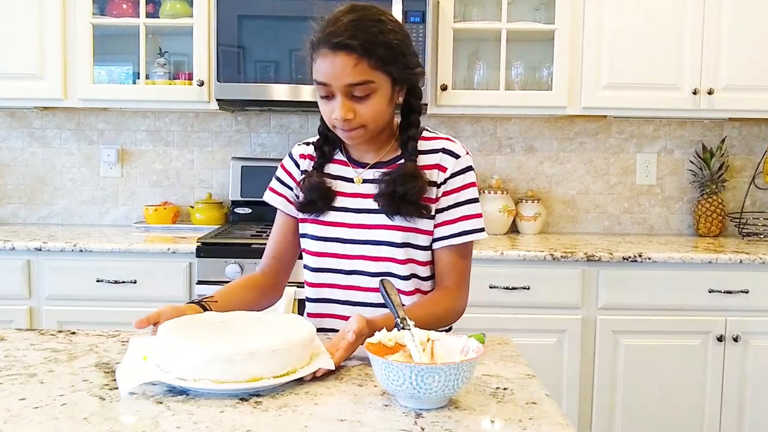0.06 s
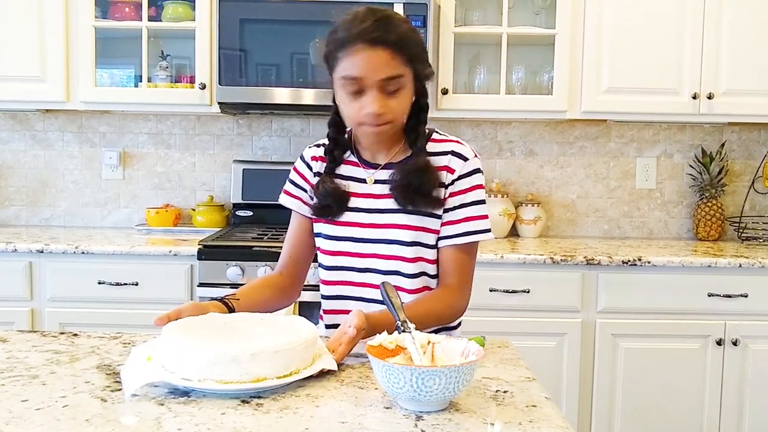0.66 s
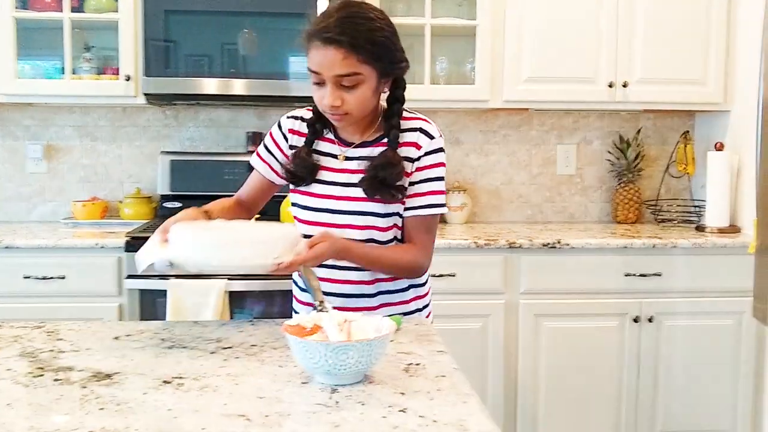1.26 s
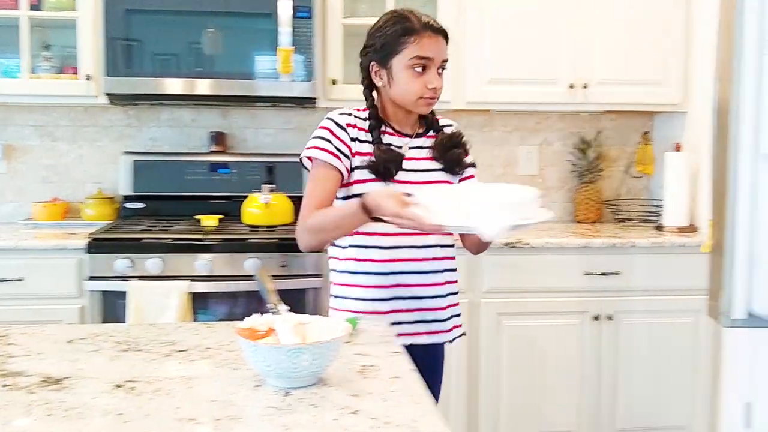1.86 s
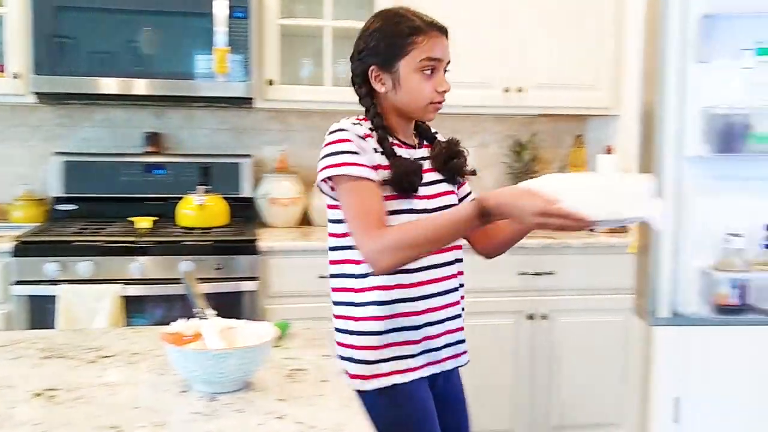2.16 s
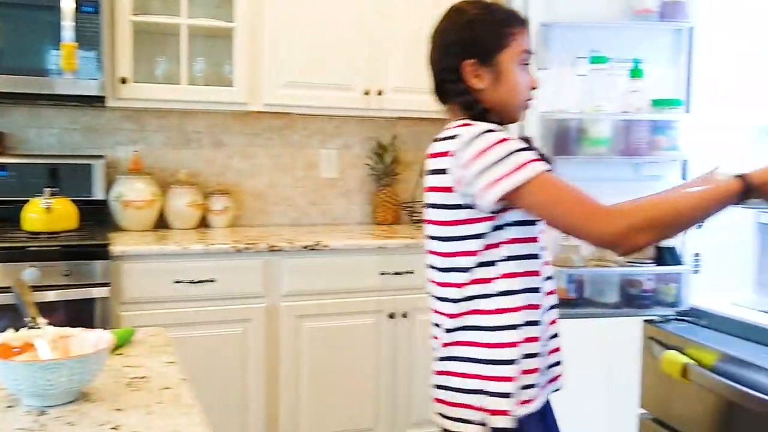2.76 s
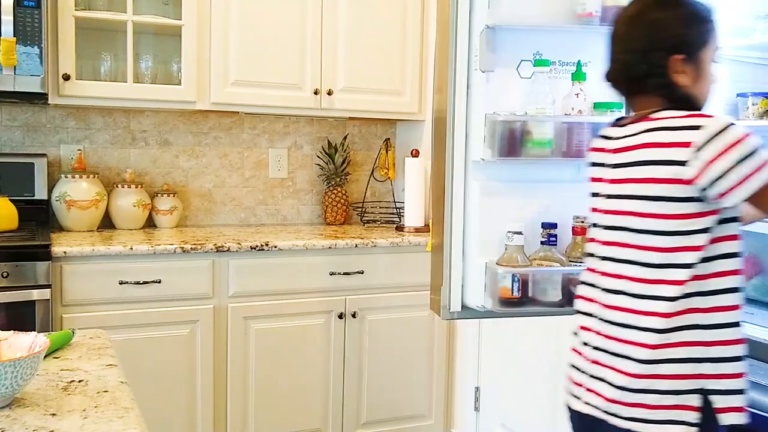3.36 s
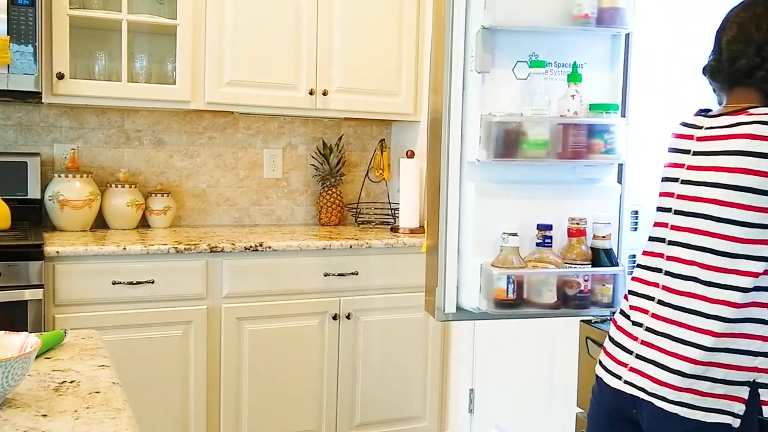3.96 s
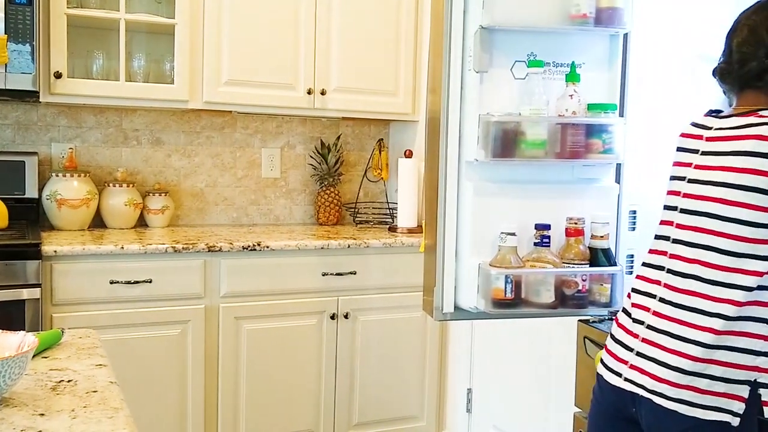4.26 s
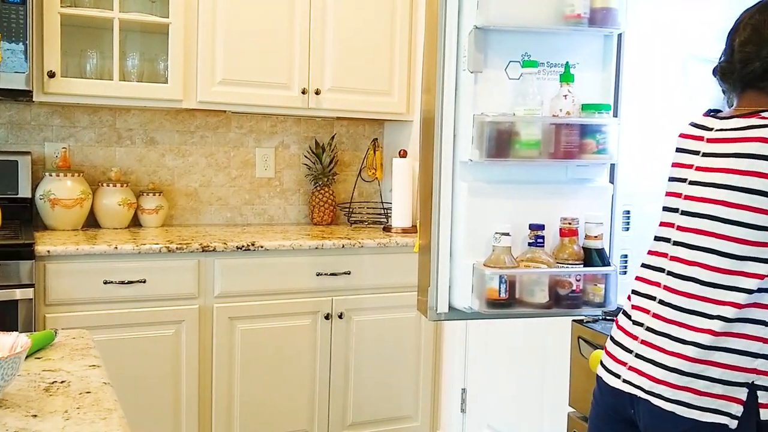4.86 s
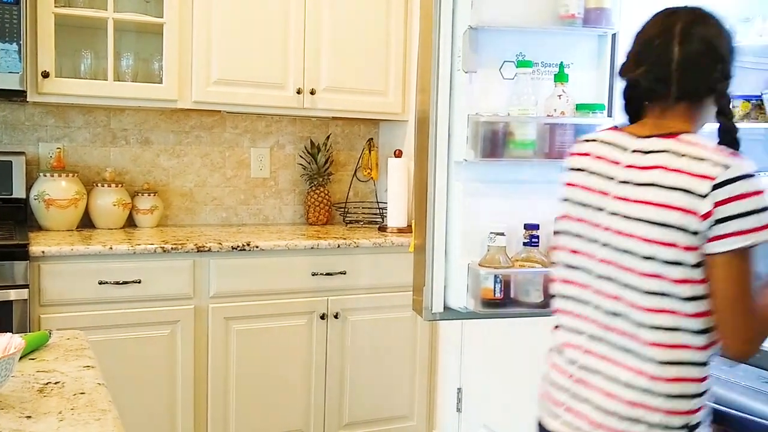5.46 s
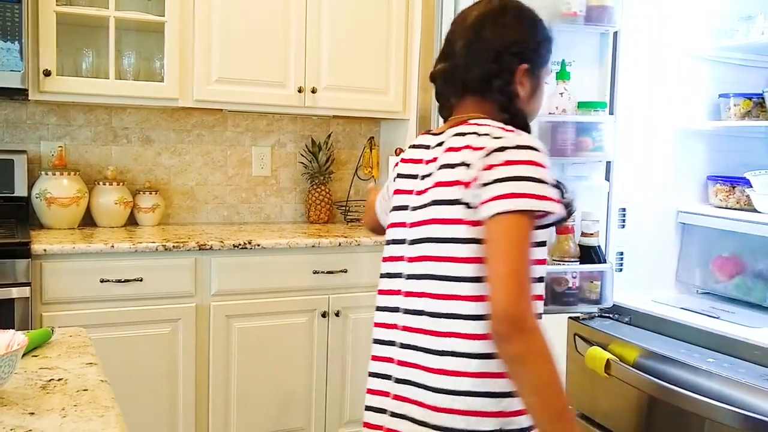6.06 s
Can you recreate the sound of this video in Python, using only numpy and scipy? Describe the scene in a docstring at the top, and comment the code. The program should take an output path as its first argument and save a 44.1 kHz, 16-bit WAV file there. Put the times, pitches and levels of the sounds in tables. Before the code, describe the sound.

A plate scrapes off a stone counter, feet scuff and doors click, then the plate knocks onto a refrigerator shelf over a faint hum.

```python
"""A hard, bright kitchen: a cake on a plate is lifted off a stone counter and set on a refrigerator shelf.
Impacts excite damped resonances: plate and doors clack, heels and hands bump, the plate rings on the
shelf and jars rattle. Stick-slip friction makes soles scuff and the plate scrape; the refrigerator hums.
Two microphones a hand's length apart are cross-fed for width; the sound drops out briefly near the start."""
import sys
import numpy as np
from scipy import signal
from scipy.fft import rfft, irfft
from scipy.io import wavfile
from scipy.ndimage import uniform_filter1d

SR = 44100
rng = np.random.default_rng(int(sys.argv[2]) if len(sys.argv) > 2 else 0)


def materialize(psi):
    """Save the field psi as 16-bit PCM at rate SR to the path in sys.argv[1].

    A 1-D psi becomes a single channel; in a 2-D psi each row is a channel.
    """
    bounded = np.clip(np.atleast_2d(psi).T, -1, 1)
    quanta = np.round(bounded * 32767).astype(np.int16)
    wavfile.write(sys.argv[1], SR, quanta)


N = 269892
TIME = np.arange(N) / SR
EVENT_TIME = TIME[:32768]
MIC_SPACING_S, SOURCE_LAG_S = .000452, .00031  # travel between microphones; lag of the direct sound

# Levels in the tables are relative; each source applies its own gain.
# spectrum of the refrigerator's moving air: frequency_hz, gain_db
AIR_SPECTRUM = [(60, -44.5), (110, -3.5), (170, -2), (260, -1), (600, -2), (1200, -2), (2000, -7.5),
                (3200, -10), (4600, -13.5), (6000, -18.5), (11000, -22.5), (12000, -36.5), (12800, -48.5)]
# fan tones: pitch_hz, level_db
FAN_TONES = [(262, -83.5), (371, -81)]
# soles, plate and doors rubbing: peak_s, rise_s, fall_s, level_db, tilt_db_per_octave
SCUFF_STROKES = [(0.021, 0.022, 0.028, -49, -3), (0.501, 0.059, 0.072, -58.5, 2),
                 (0.654, 0.0079, 0.0096, -47, -1), (1.362, 0.0082, 0.034, -59.5, -3),
                 (1.53, 0.0084, 0.01, -50.5, -7.5), (1.6, 0.034, 0.085, -55.5, -6.5),
                 (1.706, .011, 0.032, -51, -12.5), (2.141, 0.0088, 0.029, -38, -2.5),
                 (2.258, 0.018, 0.016, -40.5, -1.5), (2.522, 0.011, 0.023, -39.5, 3),
                 (2.861, 0.029, 0.13, -63, -6.5), (3.066, 0.016, 0.038, -34, 2),
                 (3.231, .0046, 0.023, -53, -1), (3.326, 0.0076, 0.037, -52.5, -2),
                 (3.57, 0.019, 0.061, -61.5, -3), (3.9, 0.0057, 0.027, -56, -1.5),
                 (5.119, 0.055, 0.089, -51.5, 0), (6.022, 0.025, 0.033, -41, 3),
                 (6.055, 0.019, 0.027, -42.5, 0.5)]
# spectrum of rubbing: frequency_hz, gain_db
SCUFF_SPECTRUM = [(150, -17), (600, -14.5), (1100, -12), (1900, -15), (2700, -5), (4200, -1.5),
                  (5700, -2.5), (7000, -8), (10500, -9), (12000, -16), (13500, -33)]
# impacts of plate and door fittings: start_s, level_db, pitch_hz, ring_db, tilt_db_per_octave, room_db
HARD_IMPACTS = [(0.0195, -39, 5700, 5, 1, -12), (0.6494, -46, 3400, -9, 1, -1),
                (0.6616, -44, 5500, 10, -8, -20), (1.003, -52.5, 1420, -10, -4.5, 2),
                (1.0218, -52.5, 2440, -1, -1, 7.5), (1.0589, -32, 10900, -5, -0.5, -4),
                (1.0665, -32.5, 5430, 4, 4, -3), (1.069, -22.5, 10800, -2.5, 0, -5),
                (1.076, -30.5, 1356, 1, -3.5, -3), (1.5264, -43, 10300, -3, 2.5, -4),
                (1.533, -48, 10000, -9, -5, -10), (1.564, -48, 8850, -1, -2, -4),
                (1.687, -54, 1180, -2, 1.5, 6.5), (2.0758, -61, 3350, -2, -4, 2),
                (2.143, -24.5, 5660, -1, 1.5, -5.5), (2.149, -35, 8200, 7, -1, -11),
                (2.16, -35, 1940, 0, -4, -6), (2.216, -45, 3370, -7, 4, 2), (2.2203, -42, 5650, -9, 1, 4.5),
                (2.242, -29.5, 2910, 0, 3, -13), (2.2556, -39.5, 10650, 16, 3, -2),
                (2.274, -43, 3060, 5, 1, -2), (2.511, -53, 5500, -1, 6, 2),
                (2.7021, -49.5, 3000, -8.5, -2, 0.5), (3.748, -63, 1190, -8, -5.5, -2.5),
                (3.787, -57, 1680, -10, -8, -3), (5.8858, -57.5, 3760, -7, -3.5, 0.5),
                (5.935, -57.5, 3330, -11, -4.5, 6)]
# spectrum of a hard impact: frequency_hz, gain_db
CLACK_SPECTRUM = [(100, -47), (200, -18.5), (600, -17), (1200, 12), (1900, 14.5), (3000, 3), (5500, 8),
                  (7000, -2), (9000, 6), (10800, -4), (12500, -2.5), (15000, -23.5)]
# impacts of heels, hands and things on shelves: start_s, level_db, pitch_hz, contact_s, room_db
SOFT_IMPACTS = [(0.7589, -48, 544, 0.0057, -13.5), (1.527, -54.5, 698, 0.014, -2),
                (1.625, -56.5, 347, 0.017, -14), (1.988, -53, 365, 0.016, -3),
                (2.145, -47.5, 710, 0.032, 4), (2.3923, -60.5, 292, 0.022, -12),
                (3.061, -57.5, 248, 0.061, -2), (3.7486, -59.5, 1187, 0.036, 0.5),
                (3.785, -59, 1162, 0.071, 5), (3.992, -53.5, 1320, 0.061, -3),
                (4.0989, -54, 1020, 0.023, -16.5), (4.335, -57.5, 560, 0.066, 3.5),
                (5.0, -56, 1390, 0.17, 7.5), (5.365, -58, 988, 0.029, 2), (5.475, -59, 555, 0.11, -14)]
# resonances of plate and counter: centre_hz, width_hz, level_db
COUNTER_RESONANCES = [(415, 400, -15.5), (1000, 200, -8), (1320, 220, 0), (1880, 250, -6.5),
                      (2350, 300, -6.5), (2920, 280, 0), (4180, 330, 1.5), (5330, 700, -3.5),
                      (8100, 1580, -10)]
# the plate set down and rocking:
# start_s, level_db, tilt_db_per_octave, ring_db, flatness (0 rim, 1 base), room_db
PLATE_LANDINGS = [(4.547, -28, 0.5, -9, 0, 4.5), (4.6154, -34.5, -1.5, -1.5, 0.95, 3),
                  (4.668, -48, 0, -9, .2, 11.5), (4.7068, -18, 1.5, -3, 1, 3), (4.757, -27, 1, -14, .8, 2),
                  (4.773, -32, 0.5, -17, 0.73, 1.5), (4.839, -46, 0.5, -1, .7, 4)]
# modes of the plate on its shelf: pitch_hz, rim_db, base_db, t60_s
PLATE_MODES = [(470, -7, -22, .12), (678, -16, -6, .15), (845, -6, -6, .16), (894, -9, -1, .13),
               (975, -1, -9, .14), (1048, -6, -8, .16), (1120, -14, 0, .2), (1215, -14, -2, .11),
               (1350, -2, 1, .12), (1492, 3, -12, .09), (1542, -10, -4, .15), (1835, -8, 0, .1),
               (2788, -14, -4, .08), (2860, -12, -5, .06), (3015, -5, -12, .06), (3150, -8, -6, .11),
               (3530, -7, -3, .08)]
# spectrum of an impact on the shelf: frequency_hz, gain_db
SHELF_SPECTRUM = [(100, -39), (180, -4), (330, -8.5), (480, -6), (600, -5), (900, 4.5), (1300, 3.5),
                  (1800, 1.5), (2200, -6.5), (2500, -5.5), (3100, -6), (3700, -7.5), (4500, -11.5),
                  (5300, -15), (7000, -29), (11000, -37), (14000, -58.5)]
# modes of jars and racks: pitch_hz, level_db, t60_s
JAR_AND_RACK_MODES = [(608, -7, .25), (765, 3, .44), (815, 3, .38), (885, -2, .2), (1105, -2, .2),
                      (1520, -3, .25), (1583, -4, .25), (1793, -2, .3), (2810, -4, .07), (3031, -5, .06),
                      (3601, -2, .08)]
# channel balance: frequency_hz, left_minus_right_db
CHANNEL_BALANCE = [(200, 0.5), (600, -3.5), (1200, 1), (3000, 3), (5000, 1.5), (8000, 7), (12000, 4.5)]
# cross-feed between the microphones: frequency_hz, share (0 to 1)
CROSS_FEED_SHARE = [(200, 0.82), (1100, 0.77), (2200, 0.94), (4400, 0.82), (6700, 0.4), (11000, 0)]
# stereo width: frequency_hz, side_db
SIDE_GAIN = [(150, 0.5), (350, 0), (600, -4), (900, -10.5), (1300, -9), (1700, -0.5), (2100, 2),
             (8000, -0.5)]


def undb(db):
    """Amplitude ratio of a level in decibels."""
    return 10 ** (np.asarray(db) / 20)


def freqs(x):
    """Frequency of each Fourier bin of x, at least 1 Hz."""
    return np.maximum(np.fft.rfftfreq(x.shape[-1], 1 / SR), 1)


def curve(points, hz):
    """Interpolation of (frequency_hz, value) points on a logarithmic frequency axis."""
    at, value = np.transpose(points)
    return np.interp(np.log(hz), np.log(at), value)


def colour(x, db):
    """Minimum-phase filtering: folding the cepstrum makes the gain per bin causal."""
    size = x.shape[-1]
    cepstrum = irfft(np.log(undb(db)), size)
    cepstrum[1:size // 2] *= 2
    cepstrum[size // 2 + 1:] = 0
    return irfft(rfft(x) * np.exp(rfft(cepstrum)), size)


def unit(x):
    """Normalisation to unit mean energy per channel."""
    return x / np.sqrt(np.mean(np.sum(x ** 2, axis=-1)))


def fade(t60):
    """Exponential decay, 60 dB down after t60 seconds."""
    return np.exp(-np.log(1000) * EVENT_TIME / t60)


def add(out, x, start_s):
    """Superposition of x on out from start_s."""
    start = max(int(start_s * SR), 0)
    out[:, start:start + x.shape[-1]] += x[:, :N - start]


def diffuse(size, bass_coherence=0.39):
    """A diffuse field at two microphones: coherence falls with frequency as a sinc function."""
    noise = rng.standard_normal((2, size))
    coherence = bass_coherence * np.sinc(2 * freqs(noise) * MIC_SPACING_S)
    mid, side = rfft(noise) * np.sqrt([1 + coherence, 1 - coherence])
    return irfft(np.array([mid + side, mid - side]), size) / 2


def kitchen(room_db, early_t60, late_t60, late_db, build_s=0.0012, dull_hz=7000):
    """Room impulse response: direct sound, dense reflections off cabinets, then duller reverberation."""
    size = len(EVENT_TIME)
    build_up = 1 - np.exp(-(EVENT_TIME / build_s) ** 2)
    early = unit(diffuse(size) * fade(early_t60) * build_up)
    late = diffuse(size) * (fade(late_t60) - fade(early_t60 / 2))
    late = unit(colour(late, -10 * np.log10(1 + (freqs(late) / dull_hz) ** 2)))
    response = undb(room_db) * (early + undb(late_db) * late)
    response[0, 0] += 1
    response[1, int(SOURCE_LAG_S * SR)] += 1
    return response


def radiate(body, db, room):
    """Convolution of a struck body with the room; db is its direct energy spread over 10 ms."""
    direct = unit(body) * undb(db) * np.sqrt(SR / 100)
    return signal.fftconvolve(direct[None], room, axes=1)


def impact(crackle_t60, crackle_db=2):
    """Contact force: one impulse and a brief crackle of the touching surfaces."""
    crackle = rng.standard_normal(len(EVENT_TIME)) * fade(crackle_t60)
    force = undb(crackle_db) * unit(crackle)
    force[0] += 1
    return force


def resonance(pitch_hz, cycles):
    """A damped oscillator that builds up, then decays by about 60 dB over the given cycles."""
    t60 = cycles / pitch_hz
    return unit((fade(t60) - fade(t60 / 2)) * np.sin(2 * np.pi * pitch_hz * EVENT_TIME))


def modal_ring(modes, spread_db=1.5):
    """Free vibration is a sum of damped modes; each contact excites them differently."""
    chance = rng.standard_normal((len(modes), 2))
    return unit(sum(
        undb(db + spread_db * stir) * fade(t60) * np.sin(2 * np.pi * (hz * EVENT_TIME + phase))
        for (hz, db, t60), (stir, phase) in zip(modes, chance)))


def impulses(per_s):
    """A Poisson train of impulses of random sign."""
    size = len(EVENT_TIME)
    return (rng.random(size) < per_s / SR) * rng.choice([-1, 1], size)


def slide_speed(peak_s, rise_s, fall_s):
    """Speed of a stroke: a Gaussian pulse with unequal flanks."""
    t = EVENT_TIME - peak_s
    return np.exp(-.5 * (t / np.where(t < 0, rise_s, fall_s)) ** 2)


def refrigerator(air_db=-66.5, open_db=1, waver_db=-0.07, hum_hz=230, hum_db=-81):
    """Moving air radiates broadband noise; a low hum gives way to fan tones as the doors open."""
    air = diffuse(N)
    air = colour(air, curve(AIR_SPECTRUM, freqs(air)))
    air = air / air.std() * undb(air_db)
    fan = sum(undb(db) * np.sqrt(2) * np.sin(2 * np.pi * (hz * TIME + rng.random()))
              for hz, db in FAN_TONES)
    hum = undb(hum_db) * np.sqrt(2) * np.sin(2 * np.pi * hum_hz * TIME)
    opening = np.interp(TIME, [2.0, 3.6], [0, 1])
    waver = np.interp(TIME, np.linspace(0, TIME[-1], 40), rng.standard_normal(40))
    return hum * (1 - opening) + (air + fan * opening) * undb(open_db * opening + waver_db * waver)


def strokes(drag_s=0.077, drag_db=-19, drag_tilt=-4):
    """A slowing contact drags on: each stroke recurs later, weaker and duller."""
    for peak_s, rise_s, fall_s, db, tilt in SCUFF_STROKES:
        yield peak_s, rise_s, fall_s, db, tilt
        yield peak_s + drag_s, rise_s, fall_s, db + drag_db, tilt + drag_tilt


def scuffs(grain_db=3.8, gain_db=-2):
    """Sliding friction: a dense run of tiny slips whose amplitude follows the speed."""
    out, hz, size = np.zeros((2, N)), freqs(EVENT_TIME), len(EVENT_TIME)
    for peak_s, rise_s, fall_s, db, tilt in strokes():
        start_s = max(peak_s - 3 * rise_s, 0)
        speed = slide_speed(peak_s - start_s, rise_s, fall_s)
        slips = rng.standard_normal(size) * undb(grain_db * np.minimum(rng.exponential(size=size), 5))
        slips = colour(slips, curve(SCUFF_SPECTRUM, hz) + tilt * np.log2(np.maximum(hz, 1500)))
        slide = slips / slips.std() * speed * undb(db + gain_db)
        room = unit(kitchen(room_db=2, early_t60=0.06, late_t60=0.47, late_db=-13.5))
        add(out, signal.fftconvolve(slide[None], room, axes=1), start_s)
    return out


def clack_contacts(rebound_s=0.0055, rebound_db=-17.5, body_hz=1760, ticks=5, tick_hz=3140):
    """Inelastic impact: each clack rebounds once, weakly, at the body's pitch; handling adds ticks."""
    weak_ring_db, weak_room_db = -7, 9
    for start_s, db, pitch_hz, ring_db, tilt, room_db in HARD_IMPACTS:
        yield start_s, db, pitch_hz, ring_db, tilt, room_db
        yield start_s + rebound_s, db + rebound_db, body_hz, weak_ring_db, tilt - 0.5, weak_room_db
    for when, softness, octaves in rng.uniform(-1.3, 1, (ticks, 3)):
        start_s = np.interp(when, [-1, 1], [1.8, 5.8])
        db, tilt = -74 - 12.5 * softness, -2
        yield start_s, db, tick_hz * 2 ** octaves, weak_ring_db, tilt, weak_room_db


def clacks(gain_db=-2):
    """A short, hard impact has a broad spectrum and excites the struck part's damped resonance."""
    out, hz = np.zeros((2, N)), freqs(EVENT_TIME)
    for start_s, db, pitch_hz, ring_db, tilt, room_db in clack_contacts():
        spectrum_db = curve(CLACK_SPECTRUM, hz) + tilt * np.log2(np.maximum(hz, 1400))
        snap = colour(impact(crackle_t60=0.0059), spectrum_db)
        body = unit(snap) + undb(ring_db) * resonance(pitch_hz, cycles=22)
        room = kitchen(room_db, early_t60=0.154, late_t60=0.32, late_db=-12, build_s=0.001084)
        add(out, radiate(body, db + gain_db, room), start_s)
    return out


def bumps(width_octaves=0.81, hollow_db=4, hollow_db_per_s=-170, gain_db=-1):
    """A padded impact drives a broad, damped resonance; briefer contact leaves more hollow ring."""
    out, hz = np.zeros((2, N)), freqs(EVENT_TIME)
    for start_s, db, pitch_hz, contact_s, room_db in SOFT_IMPACTS:
        force = rng.standard_normal(len(EVENT_TIME)) * (fade(contact_s) - fade(contact_s / 2))
        detuning = np.log2(hz / pitch_hz) / width_octaves
        thud = colour(force, -10 * np.log10(1 + detuning ** 2 + detuning ** 6))
        hollow = undb(hollow_db + hollow_db_per_s * contact_s) * resonance(pitch_hz, cycles=8)
        room = kitchen(room_db, early_t60=0.3, late_t60=0.63, late_db=-8.5)
        add(out, radiate(unit(thud) + hollow, db + gain_db, room), start_s)
    return out


def plate_scrape(peak_s=1.073, rise_s=.011, fall_s=0.033, level_db=-31, spread_db=2.5, dull_hz=9000):
    """Stick-slip friction of the plate's foot on stone: each slip rings plate and counter."""
    out, hz = np.zeros((2, N)), freqs(EVENT_TIME)
    start_s = peak_s - 4 * rise_s
    speed = slide_speed(peak_s - start_s, rise_s, fall_s)
    slips = impulses(per_s=700) * undb(spread_db * rng.standard_normal(len(EVENT_TIME)))
    power = sum(undb(db) ** 2 / (1 + ((hz / centre - centre / hz) * centre / width) ** 2)
                for centre, width, db in COUNTER_RESONANCES)
    power /= 1 + (hz / dull_hz) ** 4
    grind = unit(colour(slips * speed, 10 * np.log10(power)))
    grind *= np.linalg.norm(speed) * undb(level_db)
    room = unit(kitchen(room_db=2, early_t60=0.0702, late_t60=0.48, late_db=-15.5))
    add(out, signal.fftconvolve(grind[None], room, axes=1), start_s)
    return out


def shelf_contacts(rim_lead_s=0.0035, rim_db=-11, bounces=3, bounce_s=.0075, bounce_db=-5.5):
    """The rim touches first; the plate then bounces, losing energy at each inelastic impact."""
    for start_s, db, *timbre in PLATE_LANDINGS:
        yield (start_s - rim_lead_s, db + rim_db, *timbre)
        for bounce in range(bounces):
            yield (start_s + bounce * bounce_s, db + bounce * bounce_db, *timbre)


def plate_on_shelf(gain_db=-3):
    """The point of impact, from rim to base, sets how strongly each mode of the plate is excited."""
    out, hz = np.zeros((2, N)), freqs(EVENT_TIME)
    for start_s, db, tilt, ring_db, flatness, room_db in shelf_contacts():
        modes = [(pitch_hz, np.interp(flatness, [0, 1], [rim_db, base_db]), t60)
                 for pitch_hz, rim_db, base_db, t60 in PLATE_MODES]
        knock = colour(impact(crackle_t60=0.016), curve(SHELF_SPECTRUM, hz))
        body = unit(knock) + undb(ring_db) * modal_ring(modes)
        body = colour(body, tilt * np.log2(np.maximum(hz, 200)))
        room = kitchen(room_db, early_t60=0.11, late_t60=0.59, late_db=-15.5, dull_hz=3390)
        add(out, radiate(body, db + gain_db, room), start_s)
    return out


def jar_rattle(gain_db=-18):
    """Forced vibration: each landing shakes jars and racks, whose dying taps re-excite their modes."""
    out = np.zeros((2, N))
    for start_s, db, *_ in PLATE_LANDINGS:
        taps = impulses(per_s=110) * fade(t60=0.4)
        body = signal.fftconvolve(taps, modal_ring(JAR_AND_RACK_MODES))[:len(EVENT_TIME)]
        room = kitchen(room_db=3, early_t60=0.086, late_t60=0.3, late_db=-10)
        add(out, radiate(body, db + gain_db, room), start_s)
    return out


def widen(mics, feedback=0.5161):
    """Comb filtering: subtracting each channel, delayed, from the other notches mid and side in turn."""
    hz = freqs(mics)
    left, right = rfft(mics) * undb(np.outer([1, -1], curve(CHANNEL_BALANCE, hz)) / 2)
    cross = curve(CROSS_FEED_SHARE, hz) * np.exp(-2j * np.pi * hz * MIC_SPACING_S)
    back = feedback * cross  # feedback narrows the notches
    mid = (left + right) / 2 * (1 - cross) / (1 - back)
    side = (left - right) / 2 * (1 + cross) / (1 + back) * undb(curve(SIDE_GAIN, hz))
    return irfft(np.array([mid + side, mid - side]) / np.sqrt(1 + abs(cross) ** 2 / 2), N)


def scene():
    """Superposition of all the sources at the two microphones."""
    return refrigerator() + scuffs() + clacks() + bumps() + plate_scrape() + plate_on_shelf() + jar_rattle()


def record(dry, low_hz=155, high_hz=12200, top_hz=15200, silence_s=(.86, .956)):
    """Band limiting: small microphones lose bass and top octave; the widened sound drops out once."""
    out = signal.sosfilt(signal.butter(5, low_hz, "high", fs=SR, output="sos"), widen(dry))
    out = signal.sosfilt(signal.butter(6, high_hz, fs=SR, output="sos"), out)
    audible = (TIME < silence_s[0]) | (TIME > silence_s[1])
    gate = uniform_filter1d(audible.astype(float), size=300)
    return signal.sosfilt(signal.ellip(8, .2, 70, top_hz, fs=SR, output="sos"), out * gate)


dry = scene()
out = record(dry)
materialize(out)
```